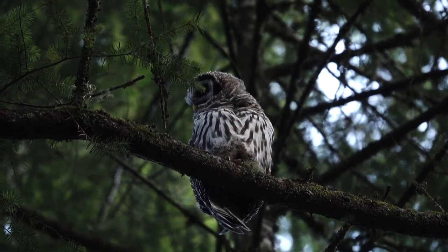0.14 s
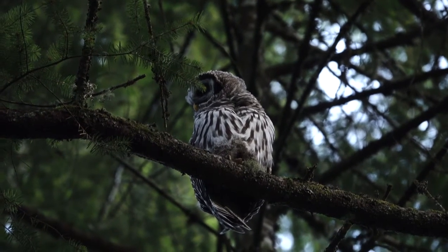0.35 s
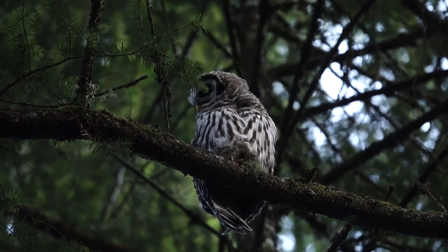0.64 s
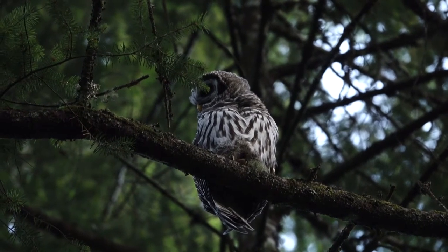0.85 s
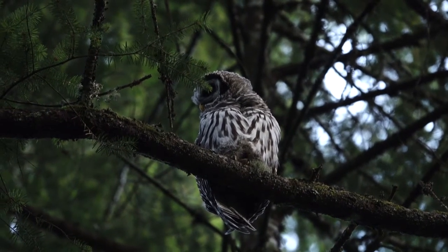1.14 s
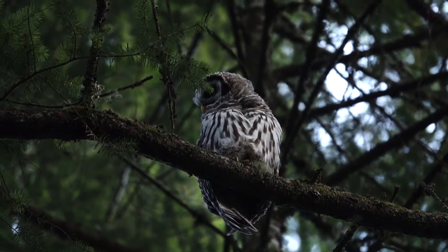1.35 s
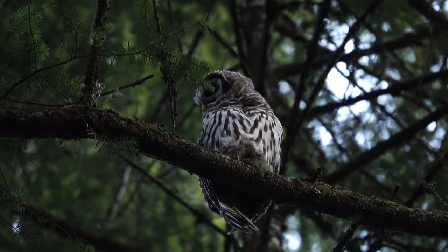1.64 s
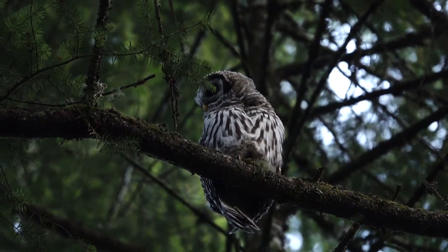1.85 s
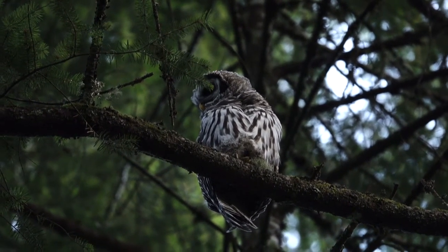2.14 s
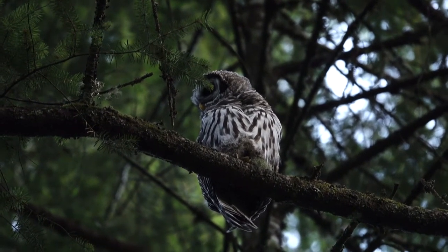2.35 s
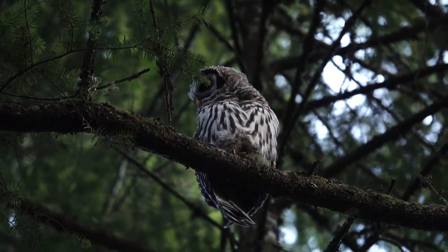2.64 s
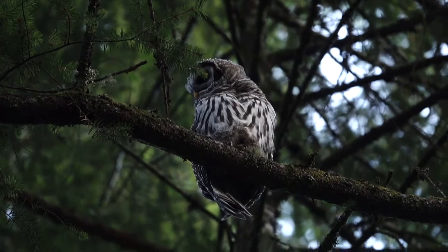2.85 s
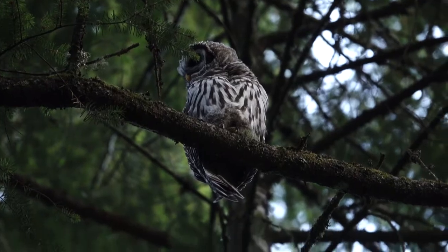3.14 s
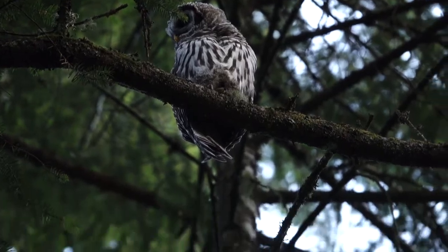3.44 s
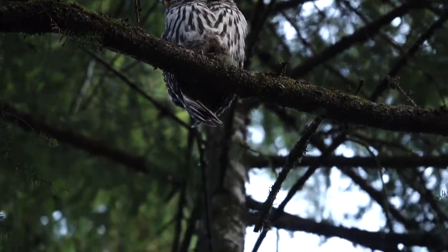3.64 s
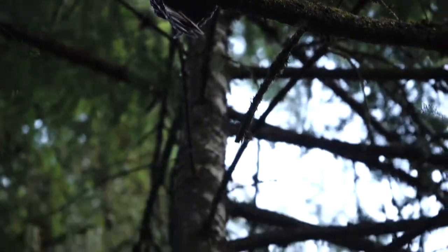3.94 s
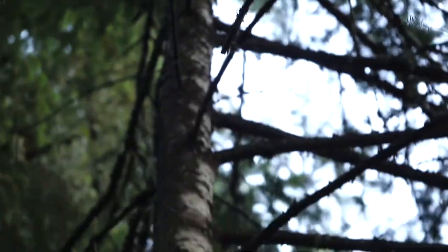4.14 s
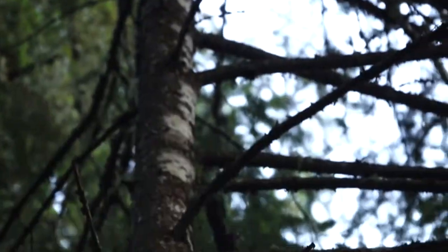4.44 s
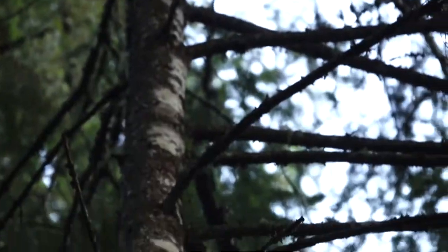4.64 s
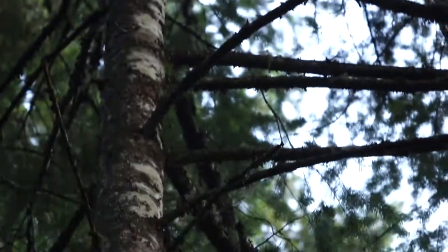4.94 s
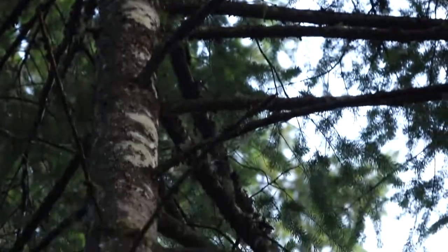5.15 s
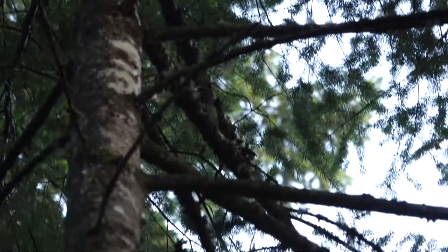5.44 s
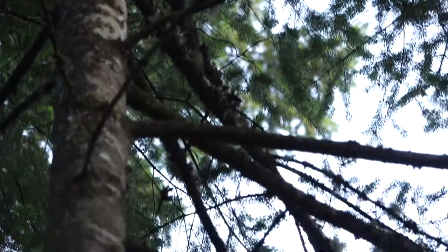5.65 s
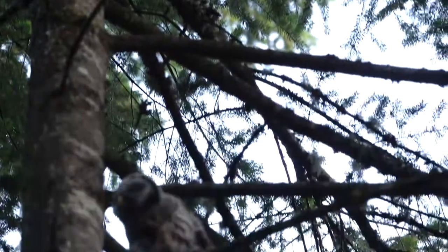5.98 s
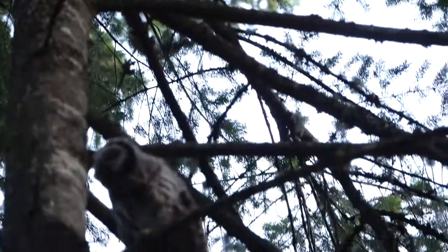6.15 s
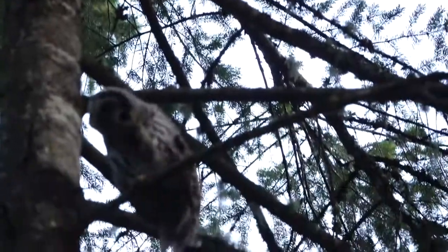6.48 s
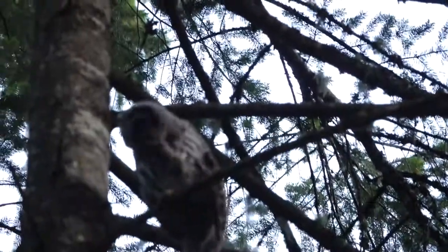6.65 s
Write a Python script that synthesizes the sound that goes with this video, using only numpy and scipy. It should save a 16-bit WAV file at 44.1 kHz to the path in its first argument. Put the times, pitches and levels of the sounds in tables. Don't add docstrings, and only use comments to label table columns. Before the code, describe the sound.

A quiet forest with a low, distant hum and light hiss, heard through a handheld camera's stereo microphones. Piercing, very brief robin notes sound right of centre, each trailed by woodland echoes, with weak peeps deeper in the trees. Small plastic clicks come from the grip, one stronger just before four seconds. Then a begging owlet's wheezy high screech rises, roughens and stops suddenly. Hand rumble increases, and one last robin chirp follows.

```python
import sys
import numpy as np
from scipy import signal
from scipy.fft import next_fast_len
from scipy.io import wavfile
from scipy.ndimage import uniform_filter1d

SR = 44100
rng = np.random.default_rng(int(sys.argv[2]) if len(sys.argv) > 2 else 0)


def invert_db(x):
    u = np.asarray(x, float) / 20
    return 10 ** u


def materialize(psi):
    bounded = np.clip(np.atleast_2d(psi).T, -1, 1)
    quanta = np.round(bounded * 32767).astype(np.int16)
    wavfile.write(sys.argv[1], SR, quanta)


N = 300321
LEAD_IN = SR // 4


def owl():
    # (time [s], whistle pitch [Hz], effort [dB], whistle over the effort [dB])
    call = [
        (4.13, 6430, -66, 5),
        (4.206, 5670, -51, 3),
        (4.29, 5392, -51, -5),
        (4.56, 5910, -50.5, 2.5),
        (4.78, 6120, -48.5, 1),
        (5.13, 6970, -39, -9.5),
        (5.235, 7240, -37, -5.5),
        (5.275, 7510, -34, -7.5),
        (5.328, 7670, -37, 1),
    ]
    # (time [s], flutter rate [Hz])
    flutter_rate = [(4.13, 1261), (4.3, 1135), (4.55, 1168), (4.8, 1507), (5.0, 1827), (5.2, 1760),
                    (5.34, 1419), (5.39, 1096)]
    # (frequency [Hz], level per Hz [dB])
    rasp_start = [(760, -47), (1300, -24.5), (1980, -15), (5510, -1), (6040, -10), (9970, -21),
                  (11000, -22.5), (15000, -28)]
    # (frequency [Hz], level per Hz [dB])
    rasp_wide = [(760, -47), (1300, -10), (1960, -18.5), (3300, -13.5), (4670, -3.5), (6040, 2.5),
                 (6760, 0.5), (7560, -10.5), (11500, -24.5), (13100, -31), (15000, -28.5)]
    # (frequency [Hz], level per Hz [dB])
    rasp_peak = [(760, -58), (1300, -28.5), (2480, -16.5), (3330, -12.5), (5620, -10), (6290, -13),
                 (7490, -3), (9000, -20), (10200, -16.5), (13800, -23), (15000, -32)]
    # (start [s], end [s], level [dB])
    slack_spells = [
        (4.17, 4.597, -63),
        (5.332, 5.42, -55),
    ]

    break_hz, break_s = 1747, .028
    hold_s, release_s, release_db = 0.025, 0.041, -11.5
    start_s, peak_s = call[0][0], call[-1][0]
    t = np.arange(start_s, peak_s + hold_s + release_s, 1 / SR)
    late = t - peak_s
    hz, rasp_db, whistle_db = curve(call, t)
    waver_hz = 45 * fuzz(len(t), 14).real
    hz = hz - break_hz * np.clip(late / break_s, 0, 1) + waver_hz
    rasp_db = rasp_db + release_db * np.clip((late - hold_s) / release_s, 0, 1)

    carrier = turn(hz)
    blur = .7 + fuzz(len(t), 25.) + .65 * fuzz(len(t), 150.) + .45 * fuzz(len(t), 600.)
    whistle = carrier * evened(blur)
    whistle = whistle * np.clip((break_s + .008 - late) / .014, 0, 1)

    flutter_hz = curve(flutter_rate, t)[0]
    flutter = turn(flutter_hz)
    upper_db = -11.5 - 3.3 * whistle_db
    upper = invert_db(np.minimum(upper_db, -6) - flutter_hz / 35 + 33) * flutter * fuzz(len(t), 170.)
    lower = invert_db(-12.5) / flutter * fuzz(len(t), 330.)
    octave = invert_db(-27) * carrier ** 2 * invert_db(upper_db) * flutter * (t < 4.6)
    tones = whistle + carrier * (upper + lower) + octave
    voiced = np.sqrt(2) * (invert_db(rasp_db + whistle_db) * tones).real

    slack = np.zeros(len(t))
    for start, end, db in slack_spells:
        arch = np.clip(4 * (t - start) * (end - t) / (end - start) ** 2, 0, 1)
        slack += invert_db(db) * arch ** 1.5
    alone = np.sqrt(2) * (invert_db(-76) + slack) * (flutter * evened(1 + fuzz(len(t), 35.))).real

    f, frame_s, z = signal.stft(rng.standard_normal(len(t)), SR, nperseg=256)
    wide = np.clip((frame_s + start_s - 4.45) / 0.95, 0, 1)
    effort = np.clip((frame_s + start_s - 5.12) / 0.2, 0, 1)
    colour_db = np.outer(read(rasp_start, f), 1 - wide)
    colour_db = colour_db + np.outer(read(rasp_wide, f), wide - effort)
    colour_db = colour_db + np.outer(read(rasp_peak, f), effort)
    colour = invert_db(colour_db) * (f > 1300)[:, None]
    colour = colour / np.sqrt((colour ** 2).mean(0))
    rasp = signal.istft(z * colour, SR, nperseg=256)[1][:len(t)]

    throat_hz = 4520 + 260 * (t - start_s)
    throat_db = -2 - 47 * (t - 4.64) ** 2
    throat = invert_db(rasp_db + throat_db) * (turn(throat_hz) * fuzz(len(t), 140.0)).real
    beak = (turn(np.full(len(t), 7250)) * fuzz(len(t), 60.)).real
    beak = invert_db(rasp_db - 11) * np.clip((t - 4.75) / 0.79, 0, 1) * beak
    voiced = voiced + throat + beak

    spurts = invert_db(4 * np.tanh(.6 * fuzz(len(t), 110.).real))
    cry = voiced * spurts ** .5 + alone + invert_db(rasp_db - 4.5) * rasp * spurts
    out = np.zeros(N + LEAD_IN)
    add(out, start_s, cry * signal.windows.tukey(len(t), .02))
    return out


def robin():
    # (time [s], level [dB], stretch in time [ratio])
    notes = [(-.13, -35.5, 1.05), (0.502, -34, 0.99), (2.731, -37, 0.93), (4.053, -39, 0.95),
             (4.729, -34, .97), (6.017, -36.5, 1.04)]
    # (frequency [Hz], level [dB])
    mixing = [(800, -34), (2200, -27), (2450, -17), (3800, -12), (5000, -30), (8500, -46), (9400, -42)]
    # (frequency [Hz], level [dB])
    overtone = [(2200, -12), (2800, -13), (3500, -13), (4300, -24), (5000, -40), (7000, -55)]
    out = np.zeros(N + LEAD_IN)
    for s, db, stretch in notes:
        t = np.arange(-.066, .024, 1 / SR / stretch)
        low_hz, low_db, high_hz, high_db = robin_voices(t)
        low_hz, high_hz = uniform_filter1d(low_hz, 120), uniform_filter1d(high_hz, 120)
        tremble_hz = 22 * fuzz(len(t), 40.).real
        low = turn(low_hz + tremble_hz)
        high = turn(high_hz) * evened(1.8 + fuzz(len(t), 120.))
        difference = invert_db(read(mixing, high_hz - low_hz)) * high / low
        total = invert_db(read(mixing, high_hz + low_hz)) * high * low
        note = invert_db(low_db) * (low + invert_db(-44) * low ** 3) + invert_db(high_db) * high
        note = note + invert_db((low_db + high_db) / 2 + 8) * (difference + total)
        note = note + invert_db(high_db - 7) * high * fuzz(len(t), 700.) * (t < -.03)
        octave = invert_db(read(overtone, 2 * low_hz)) * low ** 2 * fuzz(len(t), 510.0)
        note = note + octave * (t > .002) * np.clip((.021 - t) / 0.0036, 0, 1)
        note = np.sqrt(2) * invert_db(db) * note.real * signal.windows.tukey(len(t), .25)
        add(out, s + t[0] * stretch, note)
    return out


def robin_voices(t):
    # (time [s], level [dB])
    low_release = [(-.012, 2), (.008, -6), (.013, -23), (.024, -22)]
    # (time [s], level [dB])
    high_level = [(-.066, -24.5), (-.046, -14.5), (-.04, -22), (0, -25), (.003, -48), (.024, -75)]
    opening = 1 / (1 + np.exp((-.0457 - t) / .0057))
    rounded = np.minimum(1.03 * opening, 1 - 40 * (t + .014) ** 2)
    low_shut_hz, low_open_hz = 1099, 3493
    high_shut_hz, high_open_hz = 2017, 5900
    drop = np.exp(-np.maximum(t, 0) / 0.011)
    low_hz = low_shut_hz + (low_open_hz - low_shut_hz) * rounded * drop
    high_hz = high_shut_hz + (high_open_hz - high_shut_hz) * opening
    swell = np.clip(1 + t / 0.025, 0, 1)
    low_db = -7 - 28.5 * (1 - opening) + 2.5 * swell + curve(low_release, t)[0]
    return low_hz, low_db, high_hz, curve(high_level, t)[0]


def far_birds():
    # (time of the top [s], level [dB], top pitch [Hz], second voice [Hz], its level [dB])
    short_notes = [(0.637, -67, 4360, 3830, 4.5), (.7, -68, 4200, 3610, -2), (3.012, -61, 2537, 1530, -1),
                   (3.254, -62, 2510, 1540, -0.5), (3.493, -64, 2530, 1545, 1.5),
                   (3.655, -64.5, 2930, 4200, -21), (6.655, -70, 2949, 1760, -3),
                   (6.798, -73.5, 3300, 3900, -4)]
    # (start [s], end [s], pitch [Hz], level [dB])
    whistles = [(0, .35, 2800, -78), (2.143, 2.49, 2770, -77), (3.317, 3.493, 2770, -76),
                (3.594, 3.843, 1770, -75.5)]
    note_s = .034
    out = np.zeros(N + LEAD_IN)
    for s, db, top_hz, second_hz, second_db in short_notes:
        u = np.linspace(-1, 1, int(note_s * SR))
        arch = 1 - .2 * (u + .25) ** 2 - .12 * np.clip(-u, 0, 1) ** 2
        note = turn(top_hz * arch) + invert_db(second_db) * turn(second_hz * arch)
        blur = 3 * (top_hz < 3200) + fuzz(len(u), 100. + 250 * (top_hz > 3200))
        note = note * evened(blur)
        ragged_end = turn(top_hz * (1.4 - .45 * u)) * fuzz(len(u), 400.) * np.clip(u, 0, 1)
        note = note + invert_db(-7) * ragged_end
        fade = np.sqrt(np.abs(np.cos(np.pi * u / 2)))
        add(out, s - note_s / 2, np.sqrt(2) * invert_db(db) * note.real * fade)
    for start, end, hz, db in whistles:
        count = int((end - start) * SR)
        whistle = (turn(np.full(count, hz)) * fuzz(count, 30.)).real
        add(out, start, invert_db(db) * whistle * np.hanning(count))
    return out


def wood(x, wet_db, echo_db, linger):
    # (frequency [Hz], time [s])
    fading = [(1000, 1.5), (3500, 1.04), (7000, 0.86), (12000, 0.59)]
    # (delay [s], level over the other echoes [dB])
    trunks = [(.018, 11), (.065, -1), (.1, -11), (0.152, -22), (.2, -36)]
    taps = np.zeros((2, SR))
    at = np.arange(200, SR - 20, 20) + rng.integers(0, 20, (2, (SR - 201) // 20))
    np.put_along_axis(taps, at, rng.choice([-1., 1.], at.shape), 1)
    hz, t, z = signal.stft(taps, SR, nperseg=256)
    hz = hz[:, None]
    stands = sum(invert_db(db + echo_db) * np.exp(-((t - s) / 0.0063) ** 2) for s, db in trunks)
    fade = invert_db(-60 * t / (linger * read(fading, hz))) * np.tanh(t / 0.0024) ** 2
    z = z * (fade + stands * invert_db(-.8 * hz / 1000))
    tail = signal.istft(z, SR, nperseg=256)[1]
    tail *= invert_db(wet_db) / np.linalg.norm(tail[0])
    echoes = signal.fftconvolve(x, tail, axes=1)[:, :x.shape[1]]
    return (x + echoes)[:, LEAD_IN:]


def handling():
    # (time [s], level [dB], brightness [dB], sizzle [dB], left over right [dB])
    ticks = [(.907, -46.5, -26, -20, 1), (1.007, -46, -5.5, -10.5, 4), (1.036, -49, -13, -25, 7),
             (1.042, -59, -2.5, -25, 4), (3.9015, -28.5, -22.5, -22, 3), (4.911, -42, -20, -14, 1),
             (4.918, -36, -7, -16, 0)]
    # (frequency [Hz], level [dB], time to fall 60 dB [s])
    case = [(560, -7, .05), (800, -4, .015), (1040, -1, .016), (1200, -3, .014), (2200, -18, .004)]
    # (frequency [Hz], level [dB], time to fall 60 dB [s])
    case_bright = [(3730, 6.5, 0.0043), (5230, -16, 0.0094)]
    # (time [s], level [dB])
    thumps = [(0.531, -62), (1.021, -68), (3.33, -72), (5.47, -88)]
    t = np.arange(3000) / SR
    out = np.zeros((2, N + LEAD_IN))
    for s, db, bright_db, sizzle_db, left_db in ticks:
        tick = np.zeros(N // 50)
        tick[500:3500] = invert_db(db) * (ring(case, t) + invert_db(bright_db + 10) * ring(case_bright, t))
        crack_db = db + bright_db + sizzle_db + 12 - 60 * t / 0.0061
        tick[500:3500] += invert_db(crack_db) * rng.standard_normal(len(t))
        tick[580:3580] += .9 * invert_db(db) * ring(case[:4], t) * np.minimum(t / .0008, 1)
        tick = signal.lfilter(*signal.butter(1, 150, "high", fs=SR), tick)
        for side, sound in zip(out, ports(tick, left_db, 1.6)):
            add(side, s - 500 / SR, sound)
    for s, db in thumps:
        push = np.sin(2 * np.pi * 110 * t * np.exp(-t / .08)) * np.minimum(t / 0.0035, 1)
        for side in out:
            add(side, s, invert_db(db - 60 * t / 0.075) * push)
    return out[:, LEAD_IN:]


def ring(modes, t):
    attack = np.minimum(t / 0.00029, 1)
    return sum(invert_db(db - 60 * t / t60) * np.sin(2 * np.pi * hz * t) * attack for hz, db, t60 in modes)


def background():
    # (frequency [Hz], width [Hz], level [dB])
    hums = [(248.1, 18, -10), (368.3, 66, -14), (548.5, 26.5, -0.5), (576, 87, -1.5), (661, 56, -8.5),
            (789.9, 37, 2.5), (859.6, 92, -3.5)]
    # (frequency [Hz], level per Hz [dB])
    air_colour = [(30, -16), (60, -1), (200, -7.5), (1000, 3.5), (1500, -5.5), (2200, -7.5), (3500, -13.5),
                  (6000, -16), (10000, -18.5), (15000, -19), (15600, -31)]
    # (frequency [Hz], level per Hz [dB])
    rumble_colour = [(20, -16.5), (60, -18), (130, -6.5), (220, -4.5), (400, -8), (900, -47)]
    # (frequency [Hz], likeness [0 to 1])
    likeness = [(60, .92), (200, .9), (500, .97), (950, .93), (1250, .5), (1700, .1), (4000, .28),
                (14000, .42)]
    # (frequency [Hz], phase [radians])
    right_lead = [(40, 0), (90, .4), (170, .9), (450, 1.65), (1000, 1.7), (1300, 2.3), (2500, 0),
                  (14000, -.1)]
    # (frequency [Hz], left over right [dB])
    balance = [(60, -0.5), (180, 1.0), (540, 0.5), (1620, 3), (4860, -0.5), (14600, -1)]
    frames, hz = N // 512 + 5, np.fft.rfftfreq(2048, 1 / SR)
    t = np.arange(frames) * 512 / SR
    a, b, c, d, patches = rng.standard_normal((frames, 1025, 5)).T
    patches = evened(uniform_filter1d(uniform_filter1d(patches, 6, 0), 6, 1))

    hum = sum(invert_db(db) ** 2 / (1 + (2 * (hz - f) / w) ** 2) ** 2 for f, w, db in hums)
    wash = 1 / (1 + ((hz - 1150) / 260) ** 2) ** 2
    air = invert_db(read(air_colour, hz)) ** 2
    rumble = invert_db(read(rumble_colour, hz)) ** 2
    shade_db = -2 * np.maximum(t - 4.52, 0)
    hum_db = -50 + np.outer(hz > 460, shade_db)
    power = (hum / hum.sum())[:, None] * invert_db(hum_db) ** 2
    power = power + np.outer(rumble / rumble.sum(), invert_db(grip(t) + 1.5) ** 2)
    power = power + np.outer(wash / wash.sum(), invert_db(airy_swell(t) + 0.5) ** 2)
    power = power * invert_db(1.8 * patches) ** 2
    power = power + (air / air.sum() * invert_db(-67.5) ** 2)[:, None]

    same = np.clip(read(likeness, hz), -1, 1)[:, None]
    side = invert_db(read(balance, hz) / 2)[:, None]
    left = a + 1j * b
    right = same * left + np.sqrt(1 - same ** 2) * (c + 1j * d)
    right = right * np.exp(1j * read(right_lead, hz))[:, None]
    z = np.array([left * side, right / side]) * np.sqrt(power)
    return invert_db(2.5) * signal.istft(z, nperseg=2048, noverlap=1536)[1][:, :N]


def grip(t):
    # (time [s], level [dB])
    shifts = [(.7, -76), (1.04, -71), (2.88, -80), (3.24, -72), (3.33, -60), (3.45, -78), (3.79, -68),
              (4.3, -75), (4.7, -72), (4.93, -68), (5.06, -65), (5.27, -66.5), (5.48, -62.5), (5.74, -72),
              (5.85, -63.5), (6.03, -67), (6.26, -65)]
    half_s = 0.053
    swells = sum(invert_db(db) ** 2 * np.exp(-(2 * (t - s) / half_s) ** 2) for s, db in shifts)
    return 10 * np.log10(invert_db(-81.5) ** 2 + swells)


def airy_swell(t):
    steady_db, swell_db, rise_s, fall_s = -74, -60, 1, 0.062
    late = t - 5.33
    shape = np.exp(np.where(late < 0, late / rise_s, -late / fall_s))
    return 10 * np.log10(invert_db(steady_db) ** 2 + (invert_db(swell_db) * shape) ** 2)


def evened(x):
    return x / np.sqrt(np.mean(abs(x) ** 2) + 1e-20)


def read(points, hz):
    f, value = np.transpose(points)
    return np.interp(np.log(hz + 1), np.log(f + 1), value)


def curve(rows, t):
    s, *columns = np.transpose(rows)
    return [np.interp(t, s, c) for c in columns]


def add(mix, s, sound):
    part = mix[round(s * SR) + LEAD_IN:][:len(sound)]
    part += sound[:len(part)]


def turn(hz):
    return np.exp(2j * np.pi * np.cumsum(hz) / SR)


def fuzz(count, width_hz):
    r = np.exp(-2 * np.pi * width_hz / SR)
    z = rng.standard_normal(count) + 1j * rng.standard_normal(count)
    return evened(signal.lfilter([1], [1, -2 * r, r * r], z))


def ports(x, left_db, lead):
    z = signal.hilbert(x, next_fast_len(len(x)))[:len(x)]
    left = invert_db(left_db / 2) * (z * np.exp(-.5j * lead)).real
    right = invert_db(-left_db / 2) * (z * np.exp(.5j * lead)).real
    return np.array([left, right])


def scene():
    young = wood(ports(owl(), -9.0, -1.07), wet_db=-11.5, echo_db=-20, linger=0.7)
    near = wood(ports(robin(), -7.5, -1.1), wet_db=-9, echo_db=0, linger=1.04)
    far = wood(ports(far_birds(), -5.5, -1.28), wet_db=-8, echo_db=-14, linger=0.3)
    return young + near + far + handling() + background()


def top_cut(x):
    return signal.sosfilt(signal.butter(12, 15170, fs=SR, output="sos"), x)


def record(dry):
    return top_cut(dry)


dry = scene()
out = record(dry)
materialize(out)
```